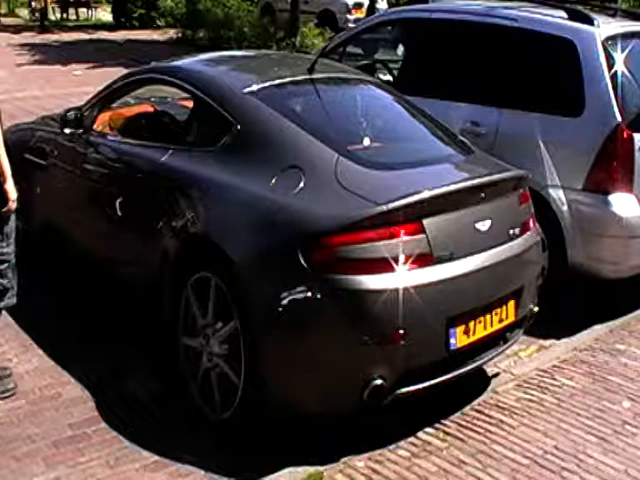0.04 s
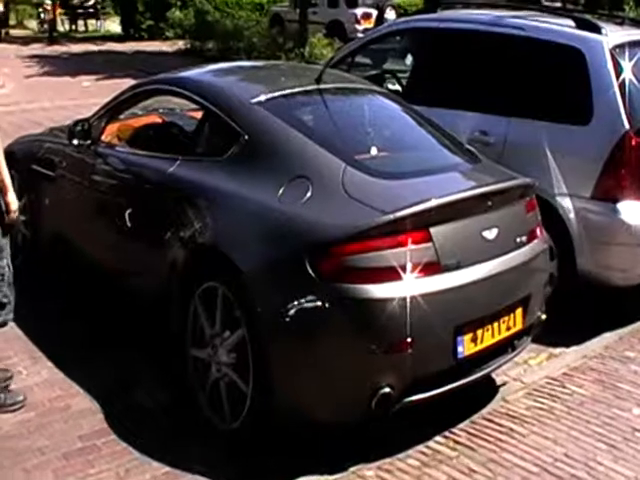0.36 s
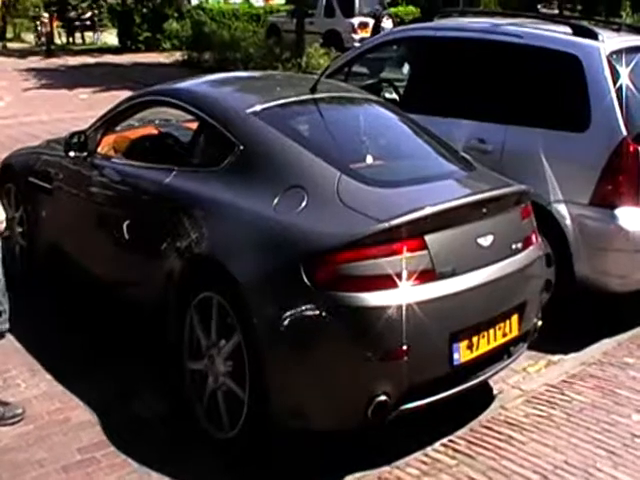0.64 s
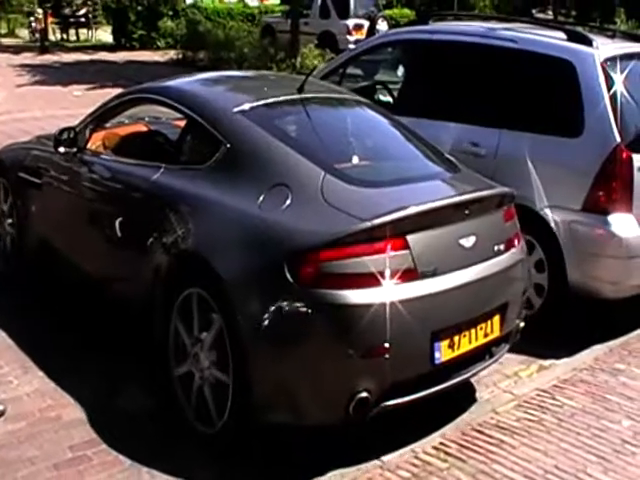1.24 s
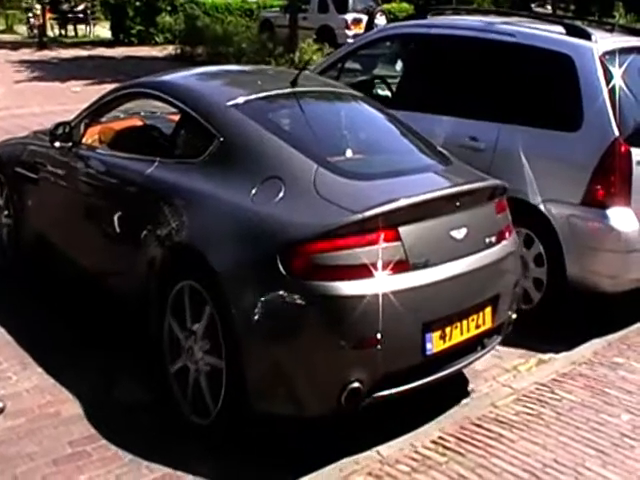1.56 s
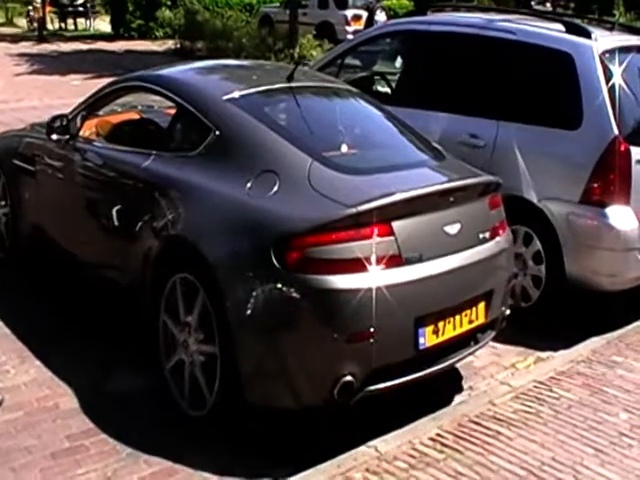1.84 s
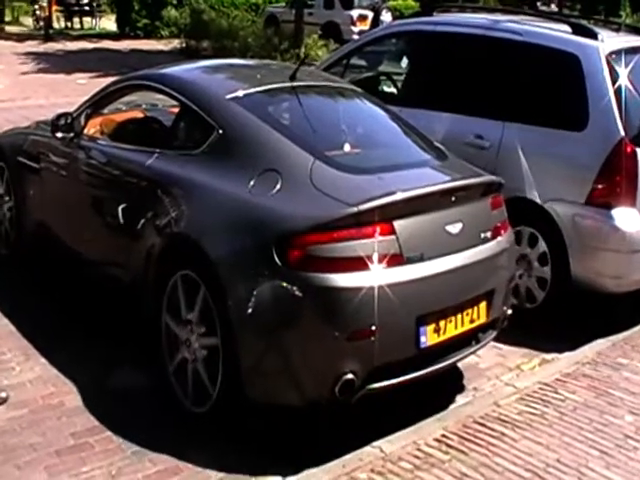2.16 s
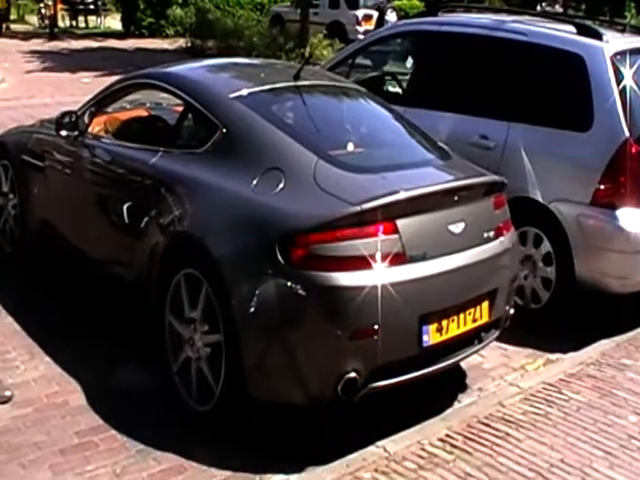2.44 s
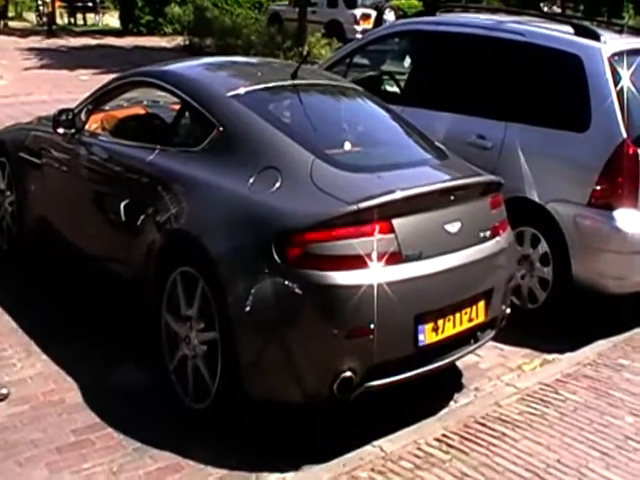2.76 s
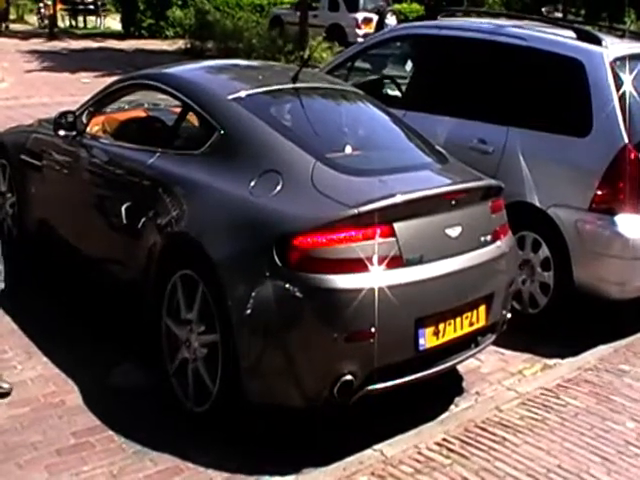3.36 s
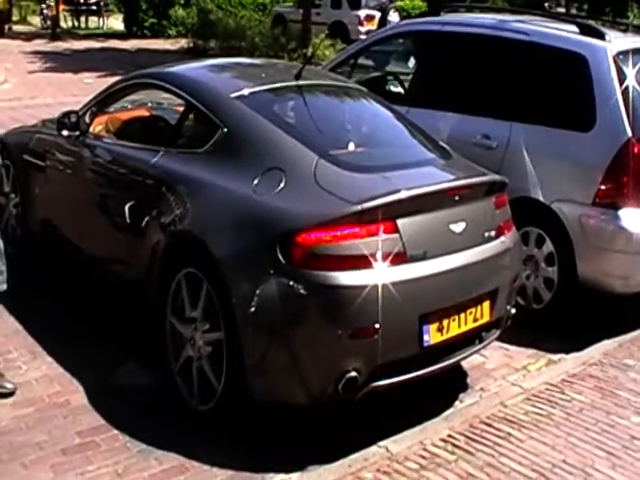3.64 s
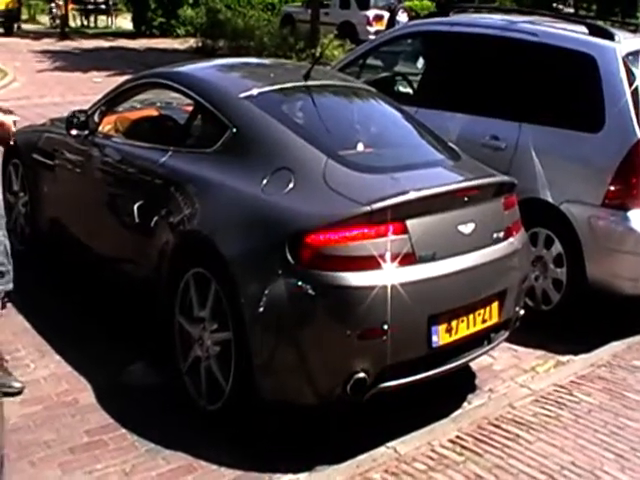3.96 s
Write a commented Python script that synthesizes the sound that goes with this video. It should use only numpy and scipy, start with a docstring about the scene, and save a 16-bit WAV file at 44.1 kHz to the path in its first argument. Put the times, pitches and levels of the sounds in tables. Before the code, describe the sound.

A sports car engine revs twice from idle, then slowly winds down.

```python
"""A V8 sports car, parked on paving a few metres away, is revved twice from idle and then slowly runs down.
Its cylinders fire unequally, booming in the silencer and rasping in the tailpipes; at speed the
firings blend into notes. With the throttle open, gas spits out once per engine cycle.
The engine bay hisses throughout and a soft thump sounds during the idle.
Two sharp cracks of unburnt fuel end the first rev."""
import sys
import numpy as np
from scipy import signal
from scipy.fft import rfft, irfft
from scipy.io import wavfile
from scipy.ndimage import uniform_filter1d

SR = 44100
rng = np.random.default_rng(int(sys.argv[2]) if len(sys.argv) > 2 else 0)


def store_wav(level_fs):
    """Save 16-bit WAV to argv[1]."""
    pcm = np.round(np.clip(np.atleast_2d(level_fs), -1, 1) * 32767)
    wavfile.write(sys.argv[1], SR, pcm.T.astype(np.int16))


N = 176400
TIME_S = np.arange(N) / SR


def gain(db):
    """Turn decibels into a number to multiply by."""
    return 10 ** (np.asarray(db) / 20)


def curve(rows):
    """Join (time_s, value) rows with straight lines."""
    return np.interp(TIME_S, *np.array(rows).T)


def colour(x, points, size=4096):
    """Make some pitches louder and others softer, following (pitch_hz, level_db) rows."""
    hz, db = np.array(points, float).T
    bins_hz = np.arange(size // 2 + 1) * SR / size
    cepstrum = irfft(np.log(gain(np.interp(np.log(bins_hz + 1), np.log(hz), db))))
    # make the filter ring only after a sound, never before it
    cepstrum[1:size // 2] *= 2
    cepstrum[size // 2 + 1:] = 0
    return signal.fftconvolve(x, irfft(np.exp(rfft(cepstrum))))[:N]


def steady(x, size=3600):
    """Hold the average level at 1 without flattening single firings."""
    power = uniform_filter1d(uniform_filter1d(x * x, size), size)
    return x / np.sqrt(np.abs(power) + 1e-18)


def clicks(times_s, sizes):
    """One click at each time, shared between the two nearest samples."""
    at = np.clip(times_s * SR, 0, N)
    i = at.astype(int)
    before = np.bincount(i, sizes * (1 - at + i), N + 2)
    after = np.bincount(i + 1, sizes * (at - i), N + 2)
    return (before + after)[:N]


def puffs(pulses, decay_s):
    """A fading burst of gas noise after each pulse."""
    fade = signal.lfilter([1], [1, -np.exp(-1 / (decay_s * SR))], pulses)
    return fade * rng.standard_normal(N)


def wobble(rate_hz):
    """A smooth random drift, roughly between -1 and 1."""
    hold = int(SR / rate_hz)
    steps = np.repeat(rng.standard_normal(N // hold + 1), hold)
    return 1.3 * uniform_filter1d(uniform_filter1d(steps, hold), hold)[:N]


def echoes(x, decay_s, size=4096):
    """A short spray of echoes, as strong as the sound itself."""
    tail = rng.standard_normal(size) * np.exp(-np.arange(size) / SR / decay_s)
    return signal.fftconvolve(x, tail / np.linalg.norm(tail))[:N]


def yard(x):
    """Add the sound that bounces off the paving and parked cars."""
    return x + gain(-14) * echoes(x, decay_s=.006)


# How fast the engine runs. Columns: time_s, firings_per_s
ENGINE_SPEED = [(0, 50), (.3, 51), (.52, 61), (.64, 71), (.76, 107), (.82, 137), (.9, 170), (1, 211),
                (1.07, 235), (1.14, 237), (1.3, 217), (1.5, 201), (1.55, 205), (1.65, 240), (1.78, 312),
                (1.9, 383), (2.02, 447), (2.08, 464), (2.14, 464), (2.3, 427), (2.5, 389), (2.7, 355),
                (2.9, 322), (3.1, 292), (3.3, 262), (3.5, 234), (3.7, 209), (4, 172)]
def firing_rate():
    """Firings per second at each moment; eight firings make one engine cycle."""
    return curve(ENGINE_SPEED)


# When the pedal is pressed. Columns: start_s, end_s
REVS = [(.64, 1.05), (1.521, 2.06)]
def throttle(travel_s=.023):
    """How far the throttle is open: 0 is shut, 1 is wide open."""
    return sum(np.clip(np.minimum(TIME_S - start, end - TIME_S) / travel_s + .5, 0, 1)
               for start, end in REVS)


# The cylinders in firing order. Columns: boom_db, rasp_db, spit_db, late_by_firings
CYLINDERS = [(0, 0, 0, 0), (-10, -8, -15, .13), (-8, -6, -15, -.1), (-3, -2, -7, .08), (-11, -9, -15, -.04),
             (-3, -2, -6, -.12), (-8, -6, -13, .11), (-10, -8, -15, -.06)]
def firings(rate_hz, pedal):
    """Pulses for the boom, rasp and spit: each cylinder has its own strength and timing."""
    fired = np.cumsum(rate_hz) / SR
    number = np.arange(int(fired[-1]))
    *level_luck, time_luck = rng.standard_normal((2048, 4))[number].T
    *levels_db, lateness = np.array(CYLINDERS)[number % len(CYLINDERS)].T
    times_s = np.interp(number + lateness, fired, TIME_S) + .00004 * time_luck
    # the cylinders are closer in strength at idle
    uneven = np.interp(np.interp(times_s, TIME_S, rate_hz), [rate_hz.min(), 105], [.2, 1])
    scatter_db = 1.2 + .8 * np.interp(times_s, TIME_S, pedal)
    return [clicks(times_s, gain(uneven * db + scatter_db * luck))
            for db, luck in zip(levels_db, level_luck)]


# The silencer's tone at idle and at speed, and the rumble under it. Columns: pitch_hz, level_db
IDLE_TONE = [(25, -23), (50, -10), (100, -4), (150, -20), (200, 7.5), (235, 3), (265, 0), (300, -3.5),
             (350, -16), (440, -18), (520, -24), (1500, -61)]
SILENCER_TONE = [(25, -53), (50, -37), (85, -28.5), (105, -21.5), (135, -34.5), (170, -9.5), (210, 1),
                 (250, -2), (300, 0.5), (350, -1.5), (390, -7.5), (440, -18), (520, -29.5), (700, -66),
                 (1500, -104)]
RUMBLE_TONE = [(25, -41), (70, -29.5), (140, -22.5), (210, -3.5), (320, -9.5), (420, -26.5), (550, -28),
               (1500, -65)]
# How loud the boom is, and how much rumble is mixed into it. Columns: time_s, level_db
BOOM_LEVEL = [(0.33, -27.5), (0.5, -29), (0.69, -15.5), (0.7, -12.5), (1.09, -19.5), (1.13, -28),
              (1.5, -20), (1.56, -12), (1.69, -17), (1.71, -15.5), (2.07, -30), (2.1, -34.5), (2.31, -28.5),
              (2.61, -18), (2.75, -14.5), (2.95, -20.5), (3.03, -17), (3.29, -18), (3.4, -19.5),
              (3.75, -15.5), (3.96, -20), (4.0, -15)]
RUMBLE_LEVEL = [(.9, -17), (1.05, -4), (1.2, -2), (1.45, -8), (1.7, -14), (2.1, -22), (2.8, -17),
                (3.5, -11), (4, -8)]
def silencer(pulses, rate_hz, pedal, idle):
    """Firings boom one by one at low speed and blend at high speed, most fully with the throttle shut."""
    idle_beats = steady(colour(pulses, IDLE_TONE))
    fast_beats = steady(colour(pulses, SILENCER_TONE))
    beats = steady(idle * idle_beats + (1 - idle) * fast_beats)
    rumble = steady(colour(rng.standard_normal(N), RUMBLE_TONE))
    rumble *= gain(curve(RUMBLE_LEVEL)) + idle * gain(-4)
    chord = steady(colour(engine_notes(rate_hz), SILENCER_TONE))
    chord_share = np.interp(rate_hz, [130, 215], [0, 1]) ** .5 * np.interp(pedal, [0, 1], [.97, .6])
    boom = steady(np.sqrt(1 - chord_share) * beats + np.sqrt(chord_share) * chord + rumble)
    return boom * gain(curve(BOOM_LEVEL) + .5)


# How loud the deep throb is. Columns: time_s, level_db
THROB_LEVEL = [(.1, -51), (.45, -47), (.62, -31), (.72, -23.5), (.8, -27), (.9, -28), (1, -63)]
def throb(rate_hz):
    """A deep tone, one wave per firing, heard at low speed."""
    return np.sqrt(2) * np.sin(2 * np.pi * np.cumsum(rate_hz) / SR) * gain(curve(THROB_LEVEL))


# The pipes' tone, throttle open and shut, and the duller firings when shut. Columns: pitch_hz, level_db
OPEN_PIPE_TONE = [(200, -20), (500, -14.5), (680, -0.5), (800, -3), (950, -1), (1150, 5.5), (1330, 5),
                  (1700, -6), (2230, 4.5), (2550, -14), (2850, -6.5), (3500, -11.5), (4300, -25),
                  (5100, -19.5), (8000, -42), (16000, -65)]
SHUT_PIPE_TONE = [(200, -23.5), (510, -24), (650, -4.5), (820, -8), (970, -3), (1300, -3), (1550, -5.5),
                  (1850, -4), (2300, -10), (2650, -15.5), (3400, -26.5), (4400, -30.5), (8000, -39),
                  (16000, -49)]
SOFT_FIRING_TONE = [(700, 5), (1300, -8.5), (2500, 0.5), (5000, 4), (16000, -71)]
# How loud the rasp is. Columns: time_s, level_db
RASP_LEVEL = [(0.09, -34), (0.1, -37.5), (0.57, -34.5), (0.64, -28), (1.0, -19.5), (1.1, -34),
              (1.44, -29.5), (1.64, -20), (1.96, -21.5), (2.03, -21.5), (2.11, -33.5), (2.21, -27.5),
              (2.35, -29), (2.45, -25), (2.55, -26), (2.59, -23.5), (2.88, -25), (2.96, -21), (3.12, -26.5),
              (3.48, -22.5), (3.68, -24.5), (4.0, -23.5)]
def tailpipes(pulses, rate_hz, pedal, idle):
    """Each firing snaps in the pipes and trails a puff of gas; the flow is smoother at idle."""
    gas = steady(puffs(pulses, decay_s=.009))
    gas += (gain(-3) + idle * gain(9)) * rng.standard_normal(N)
    overtones = snarl(rate_hz)
    hard_firings = steady(pulses) + gain(-2) * gas
    soft_firings = steady(colour(pulses, SOFT_FIRING_TONE)) + gain(3) * gas
    opened = steady(colour(hard_firings, OPEN_PIPE_TONE)) + colour(overtones, OPEN_PIPE_TONE)
    shut = steady(colour(soft_firings, SHUT_PIPE_TONE)) + colour(overtones, SHUT_PIPE_TONE)
    rasp = steady(yard(pedal * opened + (1 - pedal) * shut))
    return rasp * gain(curve(RASP_LEVEL) + 1)


# The tone of the hiss. Columns: pitch_hz, level_db
HISS_TONE = [(100, -49), (1000, -32), (3400, 14), (4500, -8), (6500, -0.5), (7300, -9.5), (13200, -5),
             (13900, -10), (16000, -17)]
# How loud the hiss is. Columns: time_s, level_db
HISS_LEVEL = [(.1, -52.5), (.5, -52), (.7, -35), (.9, -38.5), (1.12, -49.5), (1.45, -39), (1.65, -36.5),
              (2, -61), (2.1, -53.5), (2.3, -46), (2.65, -37), (2.98, -36), (3.1, -39.5), (3.45, -36),
              (4, -33.5)]
def engine_bay_hiss():
    """Belts, fan and moving air make a smooth hiss."""
    return steady(colour(rng.standard_normal(N), HISS_TONE)) * gain(curve(HISS_LEVEL))


def thump(middle_s=.2855, width_s=.0058, pitch_hz=160, fall_hz_per_s=5500):
    """A short, dull thump that drops in pitch."""
    t = TIME_S - middle_s
    swell = gain(-7.5) * np.exp(-(t / width_s) ** 2)
    return -swell * np.sin(2 * np.pi * (pitch_hz - fall_hz_per_s * t / 2) * t)


# The tone of the spitting gas. Columns: pitch_hz, level_db
SPIT_TONE = [(600, -43), (2000, 14), (3300, 11), (4300, -2), (5100, 0), (6600, -2.5), (7500, -6.5),
             (13000, -8.5), (16000, -18)]
# How loud the spitting is. Columns: time_s, level_db
SPIT_LEVEL = [(.6, -70), (.68, -33.5), (.8, -34.5), (.9, -49), (1.02, -62), (1.1, -68), (1.48, -65),
              (1.6, -43), (1.76, -27.5), (1.81, -21), (1.9, -21.5), (2.02, -23.5), (2.08, -44)]
def spitting_gas(pulses):
    """Bright, short puffs of gas; the strongest cylinder stands out once per cycle."""
    gas = yard(puffs(pulses, decay_s=.0016))
    return steady(colour(gas, SPIT_TONE)) * gain(curve(SPIT_LEVEL))


# The engine's main notes. Columns: waves_per_cycle, level_db
MAIN_NOTES = [(3, 6), (4, -9), (5, -1), (6, -7), (7, -8), (8, 2), (9, -10), (10, -7), (11, -5), (12, -11),
              (13, -9), (14, -10)]
def engine_notes(rate_hz, rows=MAIN_NOTES, wobble_db=2.6, wobble_hz=8):
    """At speed the firings blend into wavering notes, each a multiple of the cycle rate."""
    cycles = np.cumsum(rate_hz) / SR / len(CYLINDERS)
    chord = np.zeros(N)
    for waves, db in rows:
        level = gain(db + wobble_db * wobble(wobble_hz))
        chord += level * np.sin(2 * np.pi * (waves * cycles + rng.random()))
    return chord


def snarl(rate_hz, count=28, lowest_multiple=14, step_db=-.16, full_at_hz=350):
    """Higher notes on top of the main ones, growing louder as the engine speeds up."""
    rows = [(lowest_multiple + k, step_db * k) for k in range(count)]
    strength = gain(3) * np.minimum(rate_hz / full_at_hz, 1) ** 2
    return strength * steady(engine_notes(rate_hz, rows, wobble_db=4, wobble_hz=5))


# The two exhaust cracks. Columns: start_s, level_db
CRACKS = [(.9695, -1), (1.008, -7)]
# The tone of a crack. Columns: pitch_hz, level_db
CRACK_TONE = [(200, -19), (1200, 12), (2500, 5.5), (5000, -8.5), (8000, -17.5), (16000, -29)]
def exhaust_cracks():
    """Unburnt fuel pops in the pipe as the first rev ends."""
    start_s, level_db = np.array(CRACKS).T
    return colour(puffs(clicks(start_s, gain(level_db)), decay_s=.0011), CRACK_TONE)


# How strong the echoes from the sides are. Columns: pitch_hz, level_db
SIDE_TONE = [(50, -4.5), (280, -27.5), (600, -14.5), (1200, -25.5), (2300, -11), (4200, -5), (8000, -6),
             (15000, -10.5)]
def scene():
    """The car is straight ahead; nearby echoes spread its sound to the left and right."""
    rate_hz, pedal = firing_rate(), throttle()
    idle = np.interp(rate_hz, [64, 97], [1, 0])  # 1 at idle, 0 once the engine speeds up
    boom_pulses, rasp_pulses, spit_pulses = firings(rate_hz, pedal)
    car = spitting_gas(spit_pulses)
    car += silencer(boom_pulses, rate_hz, pedal, idle) + throb(rate_hz)
    car += tailpipes(rasp_pulses, rate_hz, pedal, idle)
    car += exhaust_cracks() + thump() + engine_bay_hiss()
    side = echoes(colour(car, SIDE_TONE), decay_s=.02)
    return np.array([car + side, car - side])


def record(dry, start_s=.082, fade_s=.017, top_hz=15900):
    """Fade in after a moment of silence, clip the tallest peaks and cut the highest treble."""
    fade_in = np.clip((TIME_S - start_s) / fade_s, 0, 1)
    treble_cut = signal.ellip(10, .2, 80, top_hz, fs=SR, output="sos")
    return signal.sosfilt(treble_cut, np.clip(dry * fade_in, -.95, .95))


dry = scene()
out = record(dry)
store_wav(out)
```